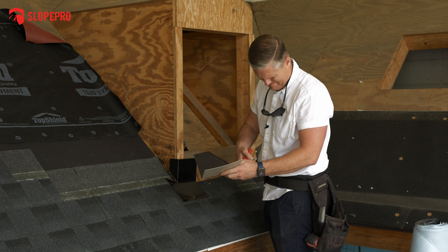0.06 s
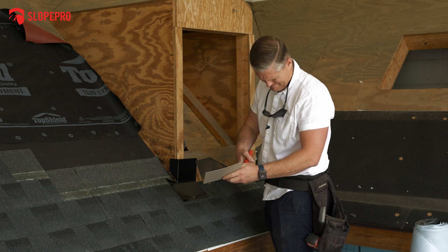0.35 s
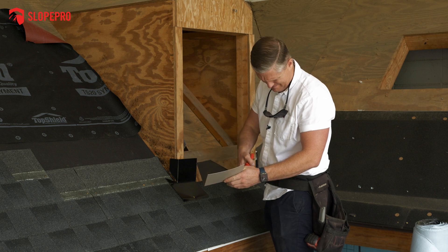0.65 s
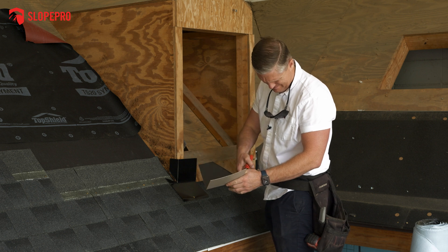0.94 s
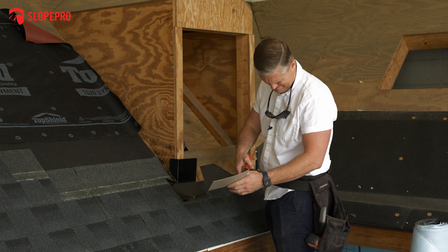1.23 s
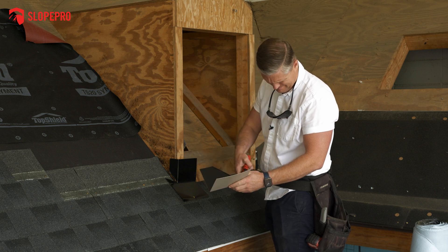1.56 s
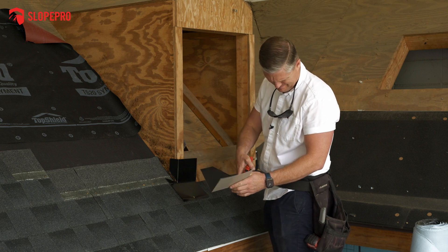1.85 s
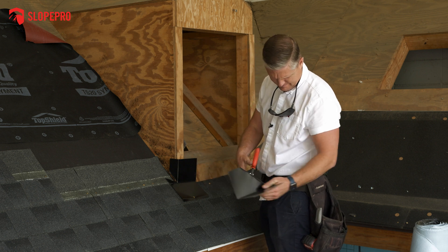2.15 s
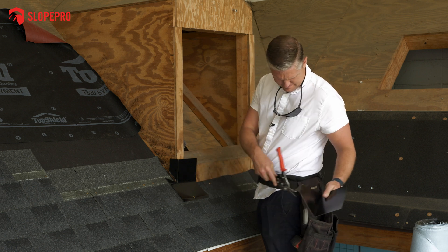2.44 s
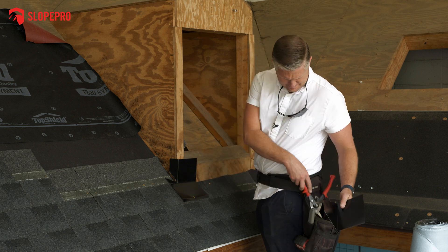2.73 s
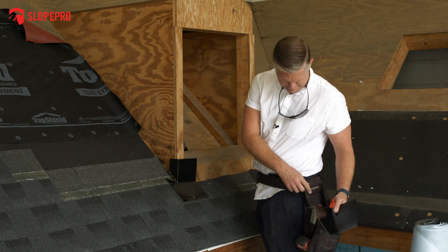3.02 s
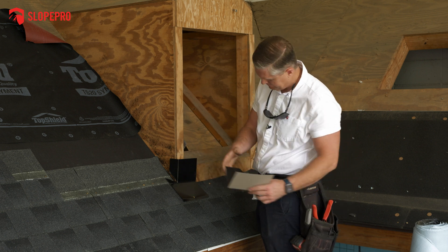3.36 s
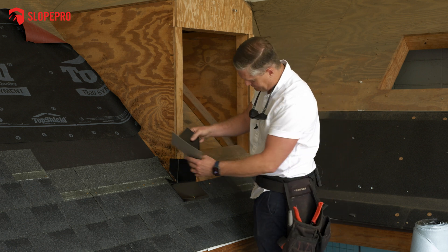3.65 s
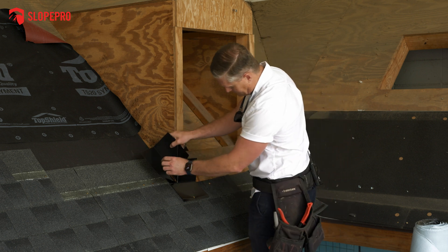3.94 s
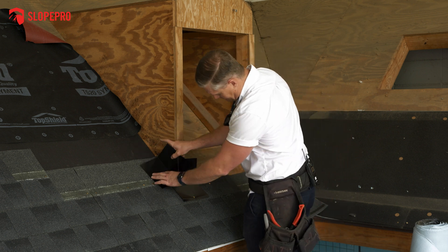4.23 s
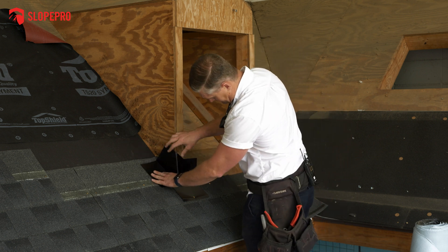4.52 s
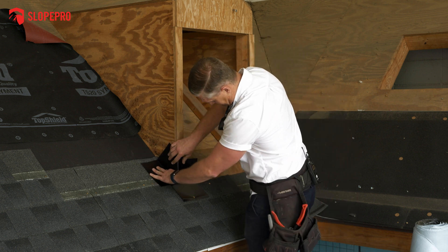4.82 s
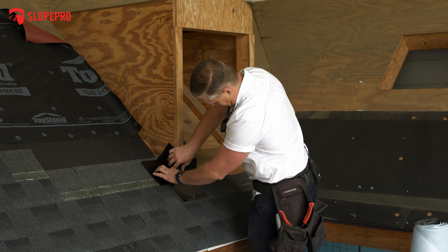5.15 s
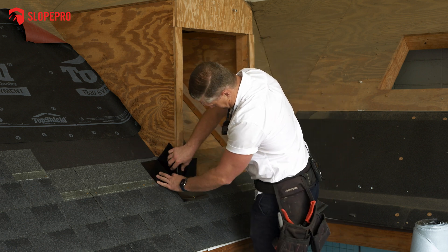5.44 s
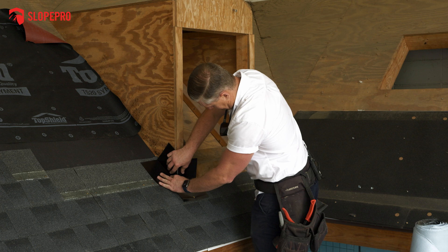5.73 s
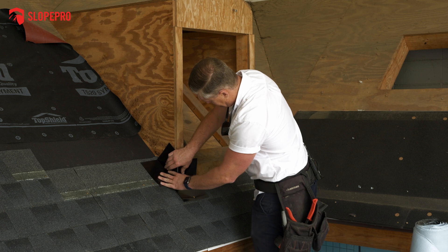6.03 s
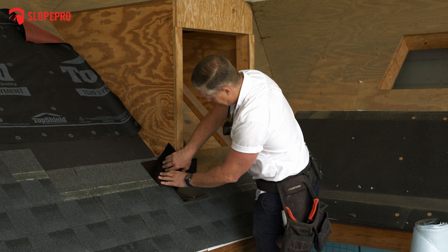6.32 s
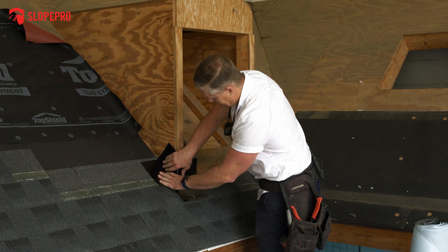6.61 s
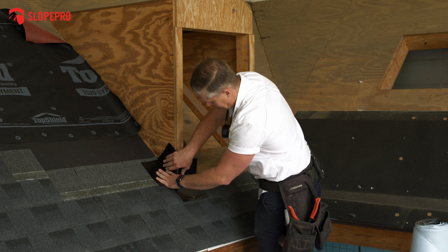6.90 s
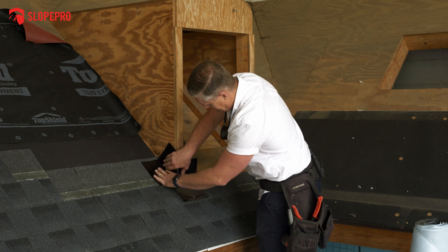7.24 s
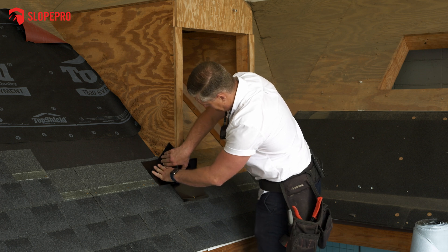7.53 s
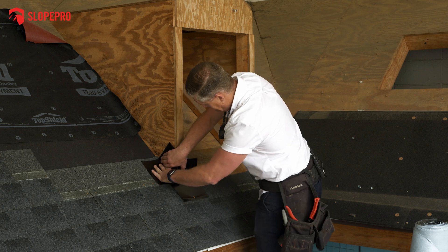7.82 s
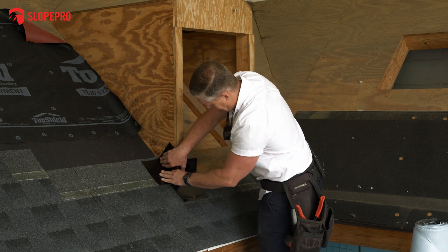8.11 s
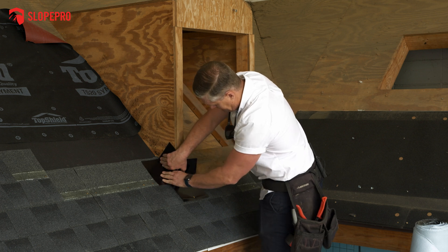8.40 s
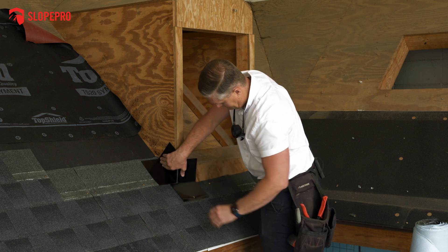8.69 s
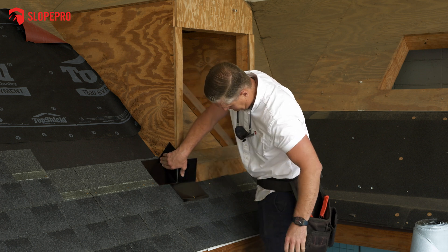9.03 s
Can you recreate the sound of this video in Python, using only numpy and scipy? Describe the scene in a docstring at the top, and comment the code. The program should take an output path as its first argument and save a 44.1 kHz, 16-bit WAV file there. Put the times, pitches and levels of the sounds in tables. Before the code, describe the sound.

Close up, hand snips make small, ringing cuts in thin sheet metal, ending in a sharp double snap and a bright ping from the jaws. After a brief rub as the tool goes into a pouch, the piece slides over rough shingles. Uneven metallic clicks and pops follow as hands bend it down, with dull plywood knocks and faint sleeve rustle. Ventilation hums softly in the fairly dry room.

```python
"""A quiet workshop, ventilation humming. A roofer trims thin metal flashing with snips: the blades
advance in tiny slips that ring the sheet, the offcut snaps free and the steel jaws ping. He drops the
snips in a tool pouch, slides the piece over gritty shingles and presses it into a corner. The sheet
clicks and buckles under his hands, the plywood deck thumps below it, and his sleeves rustle."""
import sys
import numpy as np
from scipy import signal
from scipy.io import wavfile
from scipy.ndimage import uniform_filter1d

SR = 44100
rng = np.random.default_rng(int(sys.argv[2]) if len(sys.argv) > 2 else 0)


def to_wav(sig):
    """Store sig (one row per channel, or 1-D mono) as 16-bit WAV at the path in sys.argv[1].

    Samples outside -1..1 are clipped; the rate is SR.
    """
    pcm = np.clip(np.atleast_2d(sig), -1, 1) * 32767
    pcm = np.round(pcm).astype(np.int16)
    wavfile.write(sys.argv[1], SR, pcm.T)  # frames by channels


N = 408454
BODY_MOTION = dict(rise_s=0.06, release_s=0.064, sag_db=-2)  # envelope of arm moves and leaning


def amp(db):
    """Decibels to gain."""
    return 10 ** (np.asarray(db) / 20)


def unit(x):
    """Scales to rms 1."""
    return x / np.sqrt(np.mean(x ** 2) + 1e-20)


def burst(x, seconds):
    """Scales to the energy of rms 1 held for that long."""
    return x * np.sqrt(seconds * SR / (np.sum(x ** 2) + 1e-20))


def curve(points, hz):
    """Joins breakpoints with straight lines over log frequency."""
    f, value = np.transpose(points)
    return np.interp(np.log(hz + 1), np.log(f + 1), value)


def add(mix, start_s, sound):
    """Drops a sound into the mix."""
    part = mix[max(round(start_s * SR), 0):][:len(sound)]
    part += sound[:len(part)]


def colour(x, eq, size=4096):
    """Minimum-phase EQ through (f/Hz, gain/dB) points, so attacks stay sharp."""
    log_gain = np.log(amp(curve(eq, abs(np.fft.fftfreq(size, 1 / SR)))))
    taps = np.fft.ifft(np.exp(np.conj(signal.hilbert(log_gain)))).real
    return signal.fftconvolve(x, taps[:size // 2])[:len(x)]


def grit(size, spread_db):
    """Tiny contacts of unequal strength."""
    grains, strength = rng.standard_normal((2, size))
    return unit(grains * amp(spread_db * np.clip(strength, -2, 2)))


def waver(samples):
    """A smooth random drift of rms 1 that changes over that many samples."""
    drift = uniform_filter1d(rng.standard_normal(N), samples)
    return unit(uniform_filter1d(drift, samples // 2))


def ring(modes, struck=False):
    """Dying modes; their level is the resonance gain, or the starting height when struck."""
    t = np.arange(SR // 2) / SR
    out = np.zeros(len(t))
    for hz, db, t60 in modes:
        rate = np.log(1000) / t60
        height, phase = (1, rng.random()) if struck else (2 * rate / SR, 0)
        out += height * amp(db) * np.exp(-rate * t) * np.cos(2 * np.pi * (hz * t + phase))
    return out


def resonate(force, modes):
    """The ringing that a force leaves in a body."""
    return signal.fftconvolve(force, ring(modes))[:len(force)]


def strokes(rows, rise_s, release_s, sag_db):
    """Envelope of hand strokes: each rises, peaks midway, sags toward its ends and dies away."""
    out, time = np.zeros(N), np.arange(N) / SR
    for start, length, db in rows:
        t = time - start
        off_centre = (2 * np.clip(t / length, 0, 1) - 1) ** 2
        release = np.exp(-np.maximum(t - length, 0) / release_s)
        out += amp(db + sag_db * off_centre) * np.clip(t / rise_s, 0, 1) * release
    return out


def friction(envelope, eq, spread_db, catch_db, patch_db=2.5):
    """Fine grains under an uneven grip; the colour drifts as the contact moves."""
    grains = grit(N, spread_db) * amp(catch_db * waver(400))
    spectrum = signal.stft(grains, nperseg=512)[2]
    patches = uniform_filter1d(rng.standard_normal(spectrum.shape), 18, axis=0)
    patches = unit(uniform_filter1d(patches, 16, axis=1))
    drifting = signal.istft(spectrum * amp(patch_db * patches), nperseg=512)[1][:N]
    return envelope * unit(colour(drifting, eq))


def contacts(rows, fizz_db, snap=4.06, pop_s=0.0045):
    """Each contact is a snap and a short chatter against the grit; fizz is its top octave."""
    out, t = np.zeros(N), np.arange(SR // 4) / SR
    for start, db, build, decay, body, bright in rows:
        touch = 0.76 * np.exp(-build / 0.03)  # long scuffs begin softly
        attack = np.minimum(touch + (1 - touch) * t / build, 1)
        force = grit(len(t), spread_db=5) * attack * np.exp(-np.maximum(t - build, 0) / decay)
        force[round(build * SR / 2)] += snap
        dulling_db = 3.5 * min(np.log2(decay / pop_s), 0)  # short pops barely touch the grit
        fizz = fizz_db + 0.67 * bright + dulling_db
        eq = [(50, body - 34), (200, body - 4), (560, body), (900, 0.61 * body + 1), (1500, 0),
              (2700, 0.49 * bright - 0.5), (4000, bright), (9500, fizz), (16000, fizz - 3)]
        add(out, start, amp(db) * colour(burst(force, .01), eq))
    return out


def pings(blows, modes):
    """A small free piece of metal rings after each blow; hard blows favour its high modes."""
    out = np.zeros(N)
    for start, db, hardness in blows:
        excited = [(hz, mode_db + hardness * np.log2(hz / 8000), t60) for hz, mode_db, t60 in modes]
        add(out, start, amp(db) * ring(excited, struck=True))
    return out


def ventilation(level_db=-57, waver_db=1.23):
    """The workshop's air: a low, gently wavering bed of noise."""
    # ventilation spectrum: f/Hz, level/dB
    air_eq = [(12, -32.5), (25, -31), (38, -25), (52, -6), (75, -7), (115, -4), (155, -8.5), (230, -14),
              (310, -18), (550, -20), (950, -20), (1600, -28.5), (2500, -36), (4000, -39), (8000, -42),
              (13500, -42), (16000, -45.5)]
    return amp(level_db + waver_db * waver(6000)) * unit(colour(rng.standard_normal(N), air_eq, 16384))


def room(x, onset_s=0.0014):
    """A short diffuse tail that lingers longest in the bass."""
    # reverb time: f/Hz, t60/s
    decay_times = [(100, 0.91), (500, 0.33), (2000, 0.37), (6000, 0.64), (15000, 0.26)]
    # reverb tone: f/Hz, level/dB
    tail_eq = [(100, -1), (600, 1.5), (2000, -6.5), (6000, -14), (15000, -8.5)]
    hz, t, noise = signal.stft(rng.standard_normal(SR), SR, nperseg=256)
    fade = np.exp(-np.log(1000) * t / curve(decay_times, hz)[:, None])
    tail = signal.istft(noise * amp(curve(tail_eq, hz)[:, None]) * fade, SR, nperseg=256)[1]
    tail *= np.minimum(np.arange(len(tail)) / SR / onset_s, 1) ** 2
    return signal.fftconvolve(x, tail / np.linalg.norm(tail))[:N]


def cloth_rustle():
    """Sleeves and tool belt rub as the arms move."""
    # arm moves: t/s, length/s, level/dB
    moves = [(2.1, 0.69, -68.5), (2.8, 0.55, -63), (5.02, .33, -66.5), (5.72, 0.1, -62),
             (6.02, 0.34, -65.5), (6.33, 0.59, -62.5), (7.2, .68, -63), (7.97, 0.18, -59),
             (8.19, 0.35, -65.5)]
    # cloth spectrum: f/Hz, level/dB
    rustle_eq = [(800, -8.5), (2000, -4.5), (3500, -1.5), (6500, -5), (10000, -7.5), (16000, -10)]
    return friction(strokes(moves, **BODY_MOTION), rustle_eq, spread_db=5.5, catch_db=1.0)


def deck_rumble():
    """The deck rumbles as the roofer leans his weight on it."""
    # leans: t/s, length/s, level/dB
    leans = [(5.3, 1.95, -60)]
    # rumble spectrum: f/Hz, level/dB
    rumble_eq = [(15, -26), (35, -6), (55, -0.5), (130, -5.5), (200, -12.5), (500, -41.5), (2000, -70)]
    return strokes(leans, **BODY_MOTION) * unit(colour(rng.standard_normal(N), rumble_eq, 16384))


def thumps(blows, push_s, deck_share, rattle=0.82):
    """A soft push rocks the panel for a few cycles, rattles it and rings the deck's low modes."""
    # plywood deck modes: f/Hz, level/dB, t60/s
    deck_modes = [(100, -2, .4), (122, 5, .5), (140, -2, .35), (226, -2, .22), (248, -5, .2), (331, 1, .16),
                  (453, 1, .14)]
    out, t = np.zeros(N), np.arange(SR // 2) / SR
    for start, db, hz in blows:
        eq = [(hz / 4, -34), (hz / 2, -9), (hz, 0), (hz * 3.03, -12), (hz * 6, -45), (hz * 20, -80)]
        rattling = rattle * (deck_share + 0.8) * unit(colour(rng.standard_normal(len(t)), eq))
        rocking = (1 - deck_share) * np.sin(2 * np.pi * hz * t)
        push = (rocking + rattling) * t / push_s * np.exp(-t / push_s)
        thump = push + deck_share * amp(8) * resonate(push, deck_modes)
        add(out, start, amp(db) * burst(thump, .1))
    return out


def deck_knocks(sway_delay_s=.035, sway_db=-4, sway_hz=106.5):
    """Knocks on the deck, each trailed by the sway of a slow bending wave, and softer bumps."""
    # the sheet is pushed down onto the deck: t/s, level/dB, f/Hz
    knocks = [(4.507, -36, 172), (4.811, -39.5, 150), (4.963, -46.5, 250), (6.357, -55.5, 222),
              (6.747, -47, 199), (7.033, -41, 188), (7.677, -31.5, 207)]
    # hands and snips bump the sheet: t/s, level/dB, f/Hz
    bumps = [(1.335, -49, 260), (1.432, -46, 233), (1.483, -45.5, 298), (3.29, -57.5, 278),
             (3.585, -52.5, 283), (3.742, -58, 178), (5.489, -54, 193), (8.919, -51, 110)]
    sways = [(start + sway_delay_s, db + sway_db, sway_hz) for start, db, _ in knocks]
    return (thumps(knocks, push_s=.012, deck_share=0.93)
            + thumps(sways, push_s=.017, deck_share=0.5)
            + thumps(bumps, push_s=.01, deck_share=0.15))


def shingle_slide():
    """The sheet scrapes over the shingles' grit in short pushes."""
    # pushes: t/s, length/s, level/dB
    pushes = [(3.585, 0.075, -56), (3.68, 0.15, -65), (3.845, 0.047, -64.5), (3.905, .06, -59.5),
              (4.01, 0.19, -61), (4.33, .17, -55), (4.55, 0.2, -65), (4.74, 0.27, -67), (4.97, 0.25, -66.5)]
    # scrape spectrum: f/Hz, level/dB
    scrape_eq = [(400, -16), (1200, -2.5), (2400, 0.5), (3600, -2), (5600, 2), (7800, -6.5), (10000, -3),
                 (12500, -11), (14200, -2), (16000, -10)]
    envelope = strokes(pushes, rise_s=0.0081, release_s=0.027, sag_db=-5)
    return friction(envelope, scrape_eq, spread_db=-0.5, catch_db=1.9)


def squeaks():
    """Brief rubs of the snips and the pouch excite one narrow resonance each."""
    # rubs: t/s, length/s, f/Hz, bandwidth/Hz, level/dB
    rubs = [(0, 0.076, 2640, 30, -67.5), (0.157, .2, 2920, 60, -62.5), (0.348, .046, 4620, 150, -63),
            (0.701, .022, 8300, 600, -61), (2.88, 0.069, 654, 402, -55.5), (2.965, 0.058, 487.5, 70, -44),
            (3.02, .037, 13500, 1200, -59), (3.08, 0.076, 12600, 900, -67)]
    out = np.zeros(N)
    for start, length, hz, width, db in rubs:
        t = np.arange(int(length * SR)) / SR
        wander = signal.lfilter([1], [1, -np.exp(-np.pi * width / SR)], rng.standard_normal((2, len(t))))
        wander = uniform_filter1d(wander, max(int(SR / width / 3), 1), axis=1)
        tone = ((wander[0] + 1j * wander[1]) * np.exp(2j * np.pi * hz * t)).real
        add(out, start, amp(db) * unit(tone * np.hanning(len(t))))
    return out


def jaws(tick_db=-10, build_s=.001, decay_s=.005, body_db=-16, bright_db=-6):
    """The snips' steel jaws tick and ring as they open; a harder blow ticks more."""
    # jaw modes: f/Hz, level/dB, t60/s
    jaw_modes = [(4081, -8, .23), (5841, -13, .16), (8850, -4, .23), (10500, -7, .26), (12890, 0, .16)]
    # blows on the jaws: t/s, level/dB, hardness/(dB per octave)
    blows = [(1.803, -53.5, -11), (2.277, -46, 9.5), (2.376, -62, 0), (2.413, -68, 6)]
    ticks = [(start, db + tick_db + hardness, build_s, decay_s, body_db, bright_db)
             for start, db, hardness in blows]
    return contacts(ticks, fizz_db=12) + amp(-1.5) * pings(blows, jaw_modes)


def offcut():
    """The small offcut rings as it snaps free."""
    # offcut modes: f/Hz, level/dB, t60/s
    offcut_modes = [(800, -6, .3), (996, -5, .22), (1410, -9, .2), (3981, 1, .05), (4469, 0, .05),
                    (4800, 0, .05), (5214, 0, .07), (5475, -3, .07), (6132, -11, .12), (6390, -9, .1),
                    (9659, -5, .06)]
    # blows on the offcut: t/s, level/dB, hardness/(dB per octave)
    blows = [(1.432, -32.5, 1), (1.482, -40.5, -0.68)]
    return pings(blows, offcut_modes)


def shearing(slips_per_s=1600, direct_db=-4, catch_db=0.9):
    """The blades advance in tiny, clumped slips that ring the sheet; it flexes under each squeeze."""
    # squeezes of the snips: t/s, length/s, cut level/dB, flex level/dB
    cuts = [(0.14, 0.053, -50.5, -65), (0.201, .13, -50, -55.5), (0.358, 0.074, -53, -60),
            (0.667, 0.1, -55.5, -61.5), (0.896, .055, -65, -65), (0.992, 0.21, -65, -54.5),
            (1.893, 0.056, -50, -61), (1.985, 0.039, -40.5, -72)]
    # modes of the sheet held free: f/Hz, level/dB, t60/s
    free_modes = [(257, 3, 0.1), (430, 9, 0.14), (620, -2, 0.053), (994, 6.5, .08), (1165, 2, 0.13),
                  (1337, 7, 0.12), (1543, 7.5, 0.11), (1747, 5, 0.13), (2036, 4, 0.07), (2430, -6, 0.11),
                  (2740, 6.5, 0.037), (2900, 8, 0.067), (3370, 7, 0.057), (3980, 6.5, .04),
                  (4700, 3, 0.086), (4900, 6, 0.082), (5850, 7, 0.077)]
    # cutting force spectrum: f/Hz, level/dB
    cut_eq = [(150, -10), (300, -6), (550, -8.5), (1100, 1.5), (1800, -4), (3000, -15), (5000, -13),
              (7500, -21), (15000, -26)]
    # low flexing spectrum: f/Hz, level/dB
    flex_eq = [(100, -35.5), (190, -10.5), (250, 0), (330, -12.5), (600, -28.5), (2000, -66)]
    squeeze = dict(rise_s=.014, release_s=0.021, sag_db=-5.5)
    pressure = amp(-1) * strokes([(start, length, db) for start, length, db, _ in cuts], **squeeze)
    bending = strokes([(start, length, db) for start, length, _, db in cuts], **squeeze)
    slips = unit(grit(N, spread_db=3) * (rng.random(N) < slips_per_s / SR))
    hiss = .5 * rng.standard_normal(N)
    force = unit(colour((slips + hiss) * amp(catch_db * waver(400)), cut_eq))
    body = ring(free_modes)
    body[0] += amp(direct_db)  # the bare crunch, heard alongside the ring
    steady_rms = np.std(signal.fftconvolve(force, body)[:N])
    cutting = signal.fftconvolve(force * pressure, body)[:N] / steady_rms
    flexing = bending * unit(colour(rng.standard_normal(N), flex_eq))
    return cutting + flexing


def strain_ticks(build_s=0.0025, decay_s=0.0035, vary_db=2.5, body_db=-2, bright_db=-2):
    """Faint ticks at random moments while the metal is under strain."""
    # stretches of strain: start/s, end/s, rate/(ticks per s), level/dB
    stretches = [(0.897, 1.189, 25, -69.5), (4.598, 9.249, 1.5, -71)]
    ticks = []
    for start, end, per_s, db in stretches:
        count = max(round((end - start) * per_s), 1)
        for when, strength in rng.random((count, 2)):
            tick_db = db + vary_db * (2 * strength - 1)
            ticks.append((start + when * (end - start), tick_db, build_s, decay_s, body_db, bright_db))
    return contacts(ticks, fizz_db=-20)


def buckling(ring_db=-6, click_build_share=.2):
    """Clicks, scuffs, snaps and ticks briefly ring the hand-damped flashing."""
    # modes of the damped sheet: f/Hz, level/dB, t60/s
    sheet_modes = [(453, 2, .09), (575, 0, .08), (843, 4, .08), (938, 4, .1), (1120, -1, .06),
                   (1341, 5, .1), (1669, 1, .08), (1968, 1, .08), (2297, 2, .09), (2400, 3, .1),
                   (2640, 1, .09), (2804, 3, .09), (3981, 0, .05), (4469, 0, .05), (5214, 2, .06),
                   (6300, 0, .05)]
    # sharp clicks of sheet and snips: t/s, level/dB, decay/s, body/dB, brightness/dB
    clicks = [(0.766, -70.5, .0015, -5, 3), (0.795, -64.5, 0.0071, 3, -0.5), (2.813, -62, 0.0081, 16.5, -9),
              (3.013, -61, 0.011, 15, -2), (3.064, -63.5, 0.0148, 15.5, 5), (3.29, -71, .0022, 18, 12),
              (3.901, -64, 0.0014, -20, 5), (4.092, -47.5, 0.018, 4.5, -9.5), (4.127, -51.5, 0.016, 4, -9),
              (4.333, -42.5, 0.0138, -3.5, -5.5), (4.826, -50, 0.0094, 12.5, -0.5),
              (4.861, -53, 0.012, 4, -7), (4.957, -45, 0.0057, 13.5, -4.5), (4.9624, -33, .0015, 10.5, -14),
              (5.111, -53, 0.0085, 9.5, 4), (5.273, -43.5, 0.0092, 4.5, -1), (5.347, -54, 0.0067, 3, -3),
              (5.58, -60.5, 0.0056, 11.5, -1), (5.85, -56.5, 0.0084, 8.5, -9.5),
              (6.073, -55.5, 0.0048, 2, 1), (6.159, -54.5, 0.0062, 6, -1), (6.354, -50, 0.0027, 2, -5),
              (6.358, -40.5, 0.0095, 0, -1), (6.533, -57.5, .009, 12.5, -11),
              (6.6493, -48.5, 0.0021, 12, -20), (6.7448, -43, 0.0066, 11.5, -13.5),
              (6.874, -40.5, 0.0049, 2, -1), (6.981, -63, 0.0019, -16, 9.5), (7.03, -48, 0.0077, 15, -1),
              (7.472, -63, 0.0022, -3, 5.5), (7.485, -56, 0.0077, 9.5, -2.5), (7.6652, -33.5, .007, 0, -17),
              (7.786, -56, 0.003, 2, 0), (7.812, -38.5, 0.002, 7, -2.5), (8.122, -49.5, 0.006, 4.5, -4),
              (8.208, -67, .003, 10, 5), (8.439, -64, 0.0046, 15.5, 7), (8.511, -60.5, 0.0039, -8, -1),
              (8.589, -76, .013, 1, 10), (8.634, -76, 0.009, 2, 10)]
    # the sheet drags, then gives way: t/s, level/dB, build/s, decay/s, body/dB, brightness/dB
    scuffs = [(0.784, -51, 0.0077, 0.012, 3, -24), (2.226, -55, 0.0083, .0025, -5, 5),
              (2.236, -45.5, 0.0019, 0.0015, -11, 7.5), (3.577, -46, 0.026, 0.0068, -6.5, -7),
              (4.263, -38, 0.021, 0.015, -5, -7.5), (4.318, -48, 0.0062, 0.0069, 1, -5),
              (4.466, -48.5, 0.012, 0.015, -4, 1.5), (4.5032, -39.5, 0.0067, 0.021, 9, -2.5),
              (4.744, -54.5, 0.0034, 0.073, 6, 0.5), (4.8, -46.5, .018, 0.0083, 10.5, 7),
              (6.107, -54.5, .006, 0.012, 12.5, -2), (7.022, -60.5, .007, .003, 10, 5),
              (7.673, -21, 0.0061, 0.0084, -0.5, -13)]
    # the last metal snaps between the blades: t/s, level/dB, build/s, decay/s, body/dB, brightness/dB
    snaps = [(1.43, -41, 0.0073, 0.011, -3, 7.5), (1.4804, -41, 0.0032, 0.01, 5.5, 0)]
    clicks = [(start, db, click_build_share * decay, decay, body, bright)
              for start, db, decay, body, bright in clicks]
    force = contacts(clicks, fizz_db=-10.5) + contacts(scuffs, fizz_db=-16)
    force += contacts(snaps, fizz_db=-1) + strain_ticks()
    return force + amp(ring_db) * resonate(force, sheet_modes)


def scene():
    """Sheet, snips, cloth and deck, close up in a fairly dry room."""
    sheet = amp(12) * buckling() + amp(1.5) * shearing() + offcut()
    snips = jaws() + squeaks()
    rubbing = amp(2.5) * shingle_slide() + amp(-1.5) * cloth_rustle()
    deck = amp(-3) * deck_knocks() + deck_rumble()
    near = sheet + snips + rubbing + deck
    return (near + amp(-17) * room(near) + ventilation())[None]


def record(dry):
    """A steep low-pass trims the very top of the treble."""
    lowpass = signal.firwin(401, 16150, window=("kaiser", 8), fs=SR)
    return signal.oaconvolve(dry, lowpass[None], "same")


dry = scene()
out = record(dry)
to_wav(out)
```